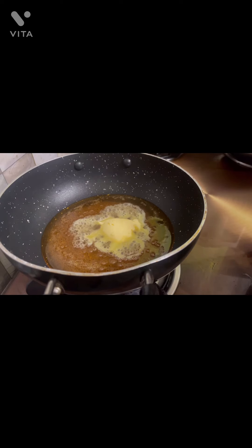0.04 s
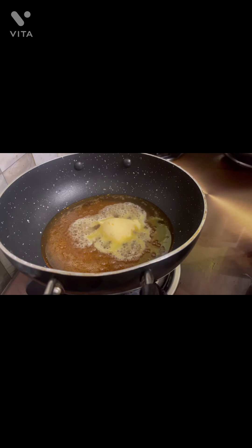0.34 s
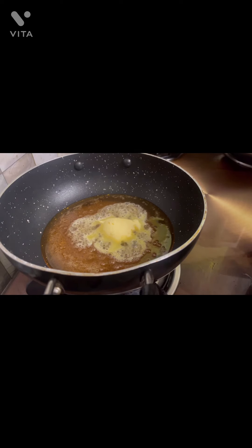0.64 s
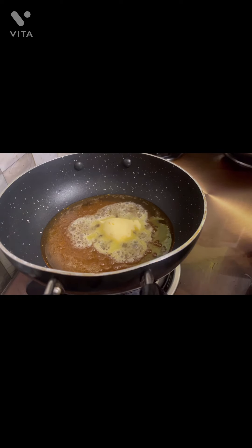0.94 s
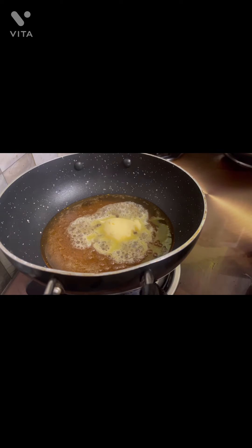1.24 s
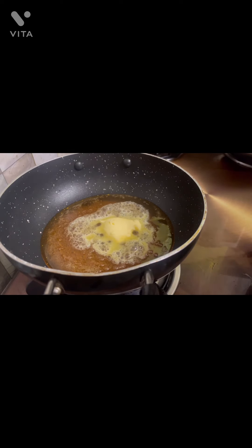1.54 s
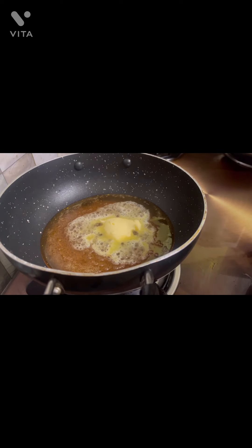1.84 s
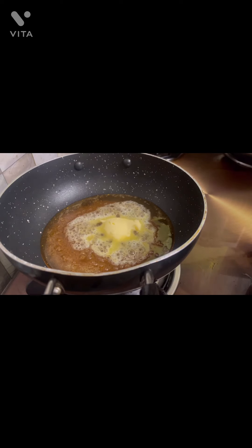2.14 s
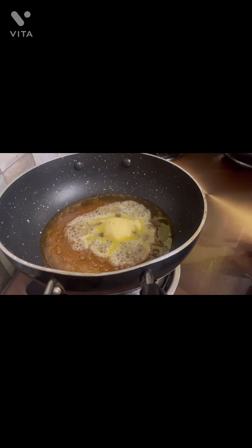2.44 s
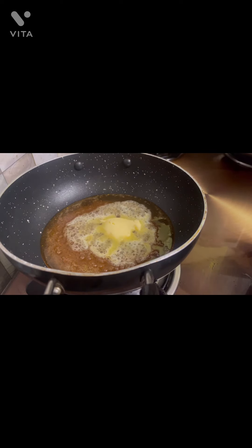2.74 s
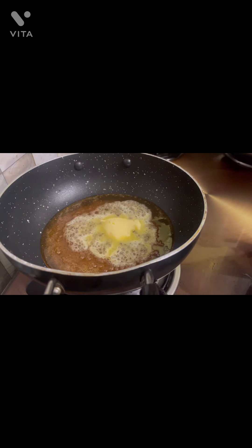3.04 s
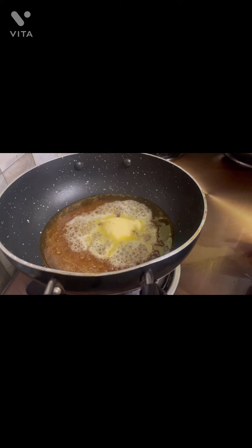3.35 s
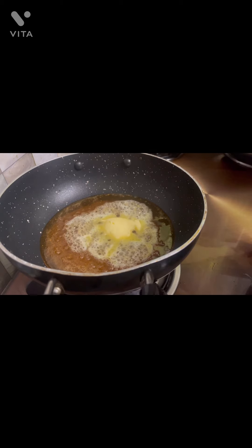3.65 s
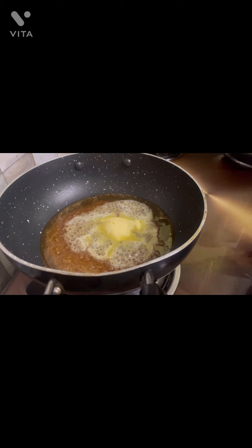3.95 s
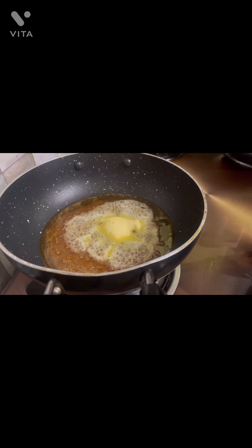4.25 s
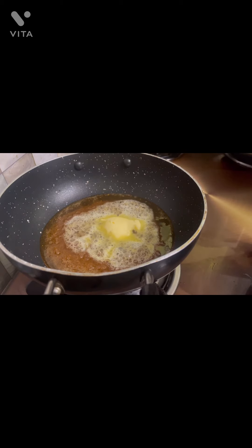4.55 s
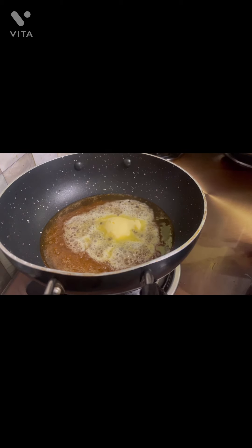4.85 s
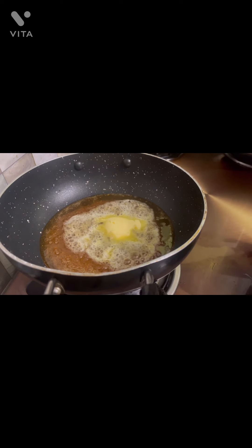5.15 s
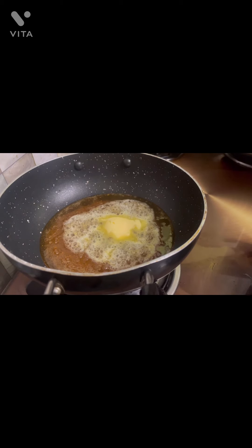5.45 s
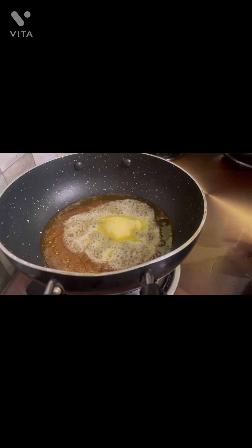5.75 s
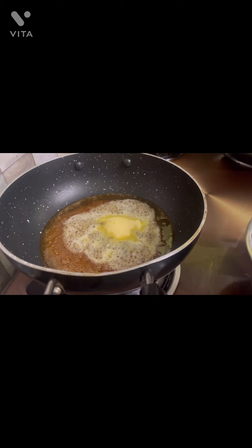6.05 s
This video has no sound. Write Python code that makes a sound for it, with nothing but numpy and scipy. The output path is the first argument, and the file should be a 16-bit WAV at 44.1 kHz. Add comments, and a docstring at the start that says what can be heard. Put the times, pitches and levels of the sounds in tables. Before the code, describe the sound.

Close, sputtering sizzle of butter melting in hot sugar, with fine crackling and a few clacks of a metal dish set down.

```python
"""Butter melting in hot caramel

Close on a kitchen pan, water boils out of the butter: some twenty times a second a bubble vents
a short jet of steam, then collapses with a falling blip. Droplets snap, the fat spits and fine
foam fizzes, easing off as the water goes. The burner rumbles softly underneath, and beside the
stove a metal dish is handled, knocked on the counter and slid along it."""
import sys
import numpy as np
from scipy import signal
from scipy.fft import rfft, irfft, next_fast_len
from scipy.io import wavfile
from scipy.ndimage import uniform_filter1d, map_coordinates

SR = 44100
rng = np.random.default_rng(int(sys.argv[2]) if len(sys.argv) > 2 else 0)


def master_out(mix):
    """Clip the mix to full scale and print it as 16-bit PCM to the path in sys.argv[1]."""
    frames = np.transpose(np.atleast_2d(mix))
    ceiling = np.clip(frames, -1, 1)
    pcm = np.round(ceiling * 32767).astype(np.int16)
    wavfile.write(sys.argv[1], SR, pcm)


N = 277124

# how hard the butter boils, driving the foam and the lesser jets: (time [s], level [dB])
BOIL_LEVEL = [(0, -0.5), (2.4, -0.64), (4.2, -2), (5.1, -3), (5.65, -1.5), (6.3, -3.5)]
# bright tone of snapping droplets and crackling foam: (frequency [Hz], level [dB])
DROPLET_EQ = [(200, -25), (700, -10), (2000, -8), (4000, -5), (7000, 0), (10000, 0), (12500, -2),
              (15500, 0)]


def amp(db):
    """Decibels to gain."""
    return 10 ** (np.asarray(db) / 20)


def unit(x):
    """Normalise to rms 1."""
    return x / np.sqrt(np.mean(x ** 2) + 1e-20)


def along(points, hz):
    """Read (frequency [Hz], value) points on a log frequency axis."""
    freqs, values = np.transpose(points)
    return np.interp(np.log(hz + 1), np.log(freqs), values)


def curve(rows):
    """Automation through (time [s], value) points, one value per sample."""
    return np.interp(np.arange(N) / SR, *np.transpose(rows))


def wobble(rate, size=N):
    """Smooth random modulation, rate knots a second."""
    knots = rng.standard_normal(int(size * rate / SR) + 4)
    return map_coordinates(knots, [np.arange(size) * rate / SR])


def chance_times(rate):
    """Random moments in seconds, rate a second on average."""
    times = np.cumsum(rng.exponential(size=400)) / rate
    return times[times < N / SR]


def add(track, s, sound):
    """Mix a sound into the track from time s on."""
    part = track[max(round(s * SR), 0):][:len(sound)]
    part += sound[:len(part)]


def filtered(x, response):
    """Apply a complex frequency response."""
    size = next_fast_len(N + SR // 2)
    return irfft(rfft(x, size) * response(np.fft.rfftfreq(size, 1 / SR)), size)[..., :N]


def resonance(hz, centre_hz, width_hz):
    """Complex response of one resonance, 1 at its centre."""
    return 1j * hz * width_hz / (centre_hz ** 2 - hz ** 2 + 1j * hz * width_hz)


def coloured(x, eq):
    """Apply an EQ curve that leaves white noise at the same power."""
    return filtered(x, lambda hz: unit(amp(along(eq, hz))))


def noise(eq):
    """Noise of rms about 1, shaped by an EQ curve."""
    return coloured(rng.standard_normal(N), eq)


def crackle(rate, spread_db):
    """Random tiny clicks at rms 1, a few much louder than the rest."""
    clicks = (rng.random(N) < rate / SR) * rng.choice([-1, 1], N)
    return unit(clicks * amp(spread_db * np.minimum(rng.standard_normal(N), 2)))


def patchy(x, depth_db):
    """Each tiny cavity has its own pitch: random peaks, hundreds of Hz wide and milliseconds long."""
    spectrogram = signal.stft(x, nperseg=256)[2]
    patches = uniform_filter1d(rng.standard_normal(spectrogram.shape), size=4, axis=0)
    patches = uniform_filter1d(patches, size=4, axis=1)
    gain = amp(depth_db * np.tanh(unit(patches)))
    return unit(signal.istft(spectrogram * gain, nperseg=256)[1][:N])


def burner(flutter_db):
    """The stove's soft, unsteady rumble."""
    rumble_level = [(0, -60.5), (.3, -53.5), (.8, -59.5), (1.2, -56.5), (2.5, -59.5), (3.9, -60),
                    (4.3, -69.5), (4.7, -70), (5.2, -57), (6.3, -59)]  # slow swells: (time [s], level [dB])
    rumble_eq = [(20, -25), (45, -15), (65, -3), (84, 3.5), (105, -4), (135, -3), (165, .5), (220, -10.5),
                 (350, -18), (700, -75), (2000, -54)]  # bass-heavy tone: (frequency [Hz], level [dB])
    return amp(curve(rumble_level) + flutter_db * wobble(4.535)) * noise(rumble_eq)


def foam(level_db, grain_db, hiss_db, flutter_db):
    """Countless small bubbles: an uneven hiss topped with fine crackle, riding the boil."""
    hiss_eq = [(100, -15), (330, 1), (450, 0), (620, 7.5), (850, 0), (1350, 4.7), (2100, -3), (2900, -1),
               (3900, -5), (5900, -1.5), (8500, -6), (11000, -4), (15500, -9)]  # tone of the fizz: (frequency [Hz], level [dB])
    grains = patchy(coloured(crackle(rate=700, spread_db=9), DROPLET_EQ), depth_db=8)
    hiss = patchy(noise(hiss_eq), depth_db=4.5)
    fizz = amp(hiss_db) * hiss + amp(grain_db) * grains
    return fizz * amp(level_db + 1.9 * curve(BOIL_LEVEL) + flutter_db * wobble(60))


def vents():
    """Cue list of venting bubbles: lesser ones keep a loose beat between the large ones."""
    # the large bubbles: (mid-jet time [s], hiss level [dB], blip level [dB], jet length [s])
    large = [(0.018, -36.5, -60, .012), (0.056, -37.5, -59, 0.026), (0.113, -33, -70, 0.021),
             (0.149, -38, -69, 0.014), (0.192, -35.5, -39.5, 0.023), (0.26, -44, -43.5, 0.033),
             (0.299, -36.5, -46, 0.028), (0.352, -36.5, -56, 0.039), (0.4, -37.5, -45.5, 0.015),
             (0.433, -45, -39.5, 0.0034), (0.453, -31, -62, 0.019), (0.519, -38.5, -43, 0.033),
             (0.579, -35.5, -46.5, 0.023), (0.662, -37.5, -42.5, 0.023), (0.742, -39.5, -44.5, 0.027),
             (0.819, -38.5, -43.5, 0.024), (0.875, -35.5, -53, 0.029), (0.984, -35.5, -51, 0.03),
             (1.042, -41, -43, 0.012), (1.066, -38.5, -45, 0.026), (1.124, -37.5, -49, 0.024),
             (1.167, -37, -59, 0.012), (1.217, -42, -41, 0.025), (1.26, -35, -50, 0.0073),
             (1.329, -39.5, -41, 0.019), (1.378, -34, -62, 0.015), (1.468, -37.5, -50, 0.0099),
             (1.585, -38, -53, 0.02), (1.635, -37, -48, 0.012), (1.74, -35, -42, 0.012),
             (1.83, -35, -61, 0.013), (1.888, -37.5, -36.5, 0.027), (1.94, -35.5, -46, 0.017),
             (2.024, -36.5, -46, 0.025), (2.087, -36, -63, 0.0094), (2.176, -37, -62, 0.014),
             (2.246, -29.5, -45, 0.006), (2.297, -35.5, -44, 0.011), (2.401, -34, -49, 0.021),
             (2.584, -36, -47.5, 0.011), (2.631, -40, -42, 0.027), (2.668, -35.5, -41, 0.0091),
             (2.744, -40, -48, 0.0069), (2.762, -29.5, -64, 0.0024), (2.789, -33, -47.5, 0.016),
             (2.838, -38, -42.5, 0.0098), (2.899, -40, -50, 0.029), (2.955, -36.5, -65, 0.015),
             (3.061, -40.5, -52, 0.013), (2.996, -38.5, -41, 0.0064), (3.095, -55, -42, 0.0072),
             (3.146, -31.5, -47, 0.0055), (3.176, -33.5, -37, 0.0073), (3.204, -40, -46, 0.013),
             (3.264, -38.5, -46, 0.016), (3.363, -37.5, -46, 0.01), (3.427, -33, -43.5, 0.0074),
             (3.571, -39.5, -49, .017), (3.649, -34, -42, 0.0089), (3.702, -41.5, -39, 0.046),
             (3.746, -38.5, -42.5, 0.012), (3.803, -52, -37.5, 0.0057), (3.956, -36, -39.5, 0.0078),
             (4.008, -46, -40, 0.011), (4.061, -44, -46, 0.01), (4.095, -42, -41, 0.015),
             (4.157, -37.5, -35.5, 0.0061), (4.195, -58, -41, 0.0063), (4.22, -48, -41, 0.011),
             (4.258, -50, -46, .006), (4.28, -38, -42.5, 0.013), (4.328, -38, -39.5, 0.0053),
             (4.361, -45, -42, .006), (4.395, -32.5, -45, 0.011), (4.512, -39.5, -38, 0.014),
             (4.579, -35, -46, 0.011), (4.663, -38.5, -39.5, 0.018), (4.703, -43, -43, 0.0089),
             (4.727, -34, -42.5, 0.013), (4.798, -34.5, -37, 0.018), (4.838, -37, -38, .008),
             (4.881, -41.5, -48, 0.014), (4.911, -36.5, -42, 0.0095), (4.977, -37, -37, 0.0089),
             (5.045, -39, -45, 0.017), (5.11, -38, -35.5, 0.0048), (5.147, -39, -44, 0.014),
             (5.198, -47, -40, 0.011), (5.231, -38, -46.5, 0.009), (5.275, -35, -41.5, 0.011),
             (5.328, -42, -43, 0.0046), (5.36, -38.5, -40, 0.0072), (5.4, -38, -42, 0.018),
             (5.513, -47, -42, 0.011), (5.669, -37.5, -40, 0.013), (5.716, -28, -45, 0.006),
             (5.802, -43, -37, 0.013), (5.841, -41.5, -40.5, 0.0096), (5.893, -35, -44.5, 0.0096),
             (5.958, -38.5, -45, 0.024), (6.034, -34.5, -47, 0.022), (6.089, -38, -39.5, 0.014),
             (6.146, -36.5, -46.5, 0.015), (6.215, -40, -46.5, 0.024), (6.275, -38, -54, 0.0058)]
    usual_gap_s, pause_s, jet_s, shrink_per_s = .042, .026, .013, .1
    gap, hiss, blip, size = rng.standard_normal((200, 4)).T
    s = np.cumsum(usual_gap_s * np.exp(.3 * gap))
    # as the water boils off, the lesser jets get softer and shorter, their blips a touch louder
    hiss_db = -38.5 + np.interp(s, *np.transpose(BOIL_LEVEL)) - hiss
    blip_db = -48 + .02 * s - blip
    length = jet_s * np.exp(.58 * size - shrink_per_s * s)
    lesser = np.column_stack([s, hiss_db, blip_db, length])
    clear_of_large = np.abs(s[:, None] - np.array(large)[:, 0]).min(axis=1) > pause_s
    return np.vstack([large, lesser[clear_of_large & (s < N / SR)]])


def jets(venting, level_db, rasp_db, sputter_db):
    """Steam hisses through a pinhole in the fat; the louder the bubble's blip, the more it rasps."""
    steam_eq = [(200, -30), (1400, -12), (4000, -10), (5200, -3), (6800, 0), (9000, -.5), (10500, 0),
                (12500, -2), (15500, 0)]  # airy hiss: (frequency [Hz], level [dB])
    rasp_eq = [(200, -20), (600, -3), (1350, 1), (2050, -2), (2900, 2), (3900, -4), (4600, -1), (5600, -3),
               (8000, -14), (15000, -30)]  # midrange rasp: (frequency [Hz], level [dB])
    t = np.arange(N) / SR
    hiss_power, rasp_power = np.zeros((2, N))
    for s, hiss_db, blip_db, length in venting:
        near = slice(max(int((s - .04) * SR), 0), int((s + .04) * SR))
        offset = 2 * (t[near] - s) / length
        opening = 1 / (1 + np.abs(offset) ** np.where(offset < 0, 7, 4))  # steep attack, softer tail
        hiss_power[near] += amp(hiss_db) ** 2 * opening
        rasp_power[near] += amp(blip_db) ** 2 * opening

    def sputter(eq):
        return noise(eq) + amp(sputter_db) * coloured(crackle(rate=2500, spread_db=9), eq)

    hiss = np.sqrt(hiss_power) * patchy(sputter(steam_eq), depth_db=5)
    rasp = np.sqrt(rasp_power) * patchy(sputter(rasp_eq), depth_db=7)
    return amp(level_db) * hiss + amp(rasp_db) * rasp


def blips(venting, level_db, small_db, small_rate, tear):
    """A bubble's film tears with a tick; the opening cavity's note dives and swells into a low gulp."""
    bowl_eq = [(150, -20), (400, -7), (620, 0), (950, -2), (1350, 1.5), (2100, -2), (2900, -1), (4000, -5),
               (7000, -10), (15000, -18)]  # colour of the pan's bowl: (frequency [Hz], gain [dB])
    start_hz, end_hz, fall_s, gulp_at_s, gulp_width_s = 1650, 590, .0014, .004, .0021  # a typical blip
    delay_s = .006  # from mid-jet to collapse
    cues = [(s + delay_s, blip_db) for s, _, blip_db, _ in venting]
    cues += [(s, small_db) for s in chance_times(small_rate)]
    track, t = np.zeros(N), np.arange(SR // 30) / SR
    for (s, db), (size, pace, tension, depth) in zip(cues, rng.standard_normal((len(cues), 4))):
        age = t / np.exp(.27 * pace)
        dive_hz = (start_hz - end_hz) * np.exp(.4 * tension) * np.exp(-age / fall_s)
        hz = end_hz * np.exp(.14 * size) + dive_hz
        hz *= np.exp(.17 * wobble(900, size=len(t)))  # the rim tears unevenly, so the note stumbles
        onset = 1.3 * np.exp(-age / .0016)
        gulp = .62 * amp(2 * depth) * np.exp(-((age - gulp_at_s) / gulp_width_s) ** 2)
        note = (onset + gulp) * np.sin(2 * np.pi * np.cumsum(hz) / SR)
        tick = tear * rng.standard_normal(len(t)) * np.exp(-t / .0015)
        add(track, s, amp(db + level_db) * (note + tick))
    return filtered(track, lambda hz: amp(along(bowl_eq, hz)))


def snaps(level_db, decay_s, spray):
    """A droplet flashes to steam on the hot metal: one very short crack and a little spray."""
    loudest = [(.111, -22.5), (.352, -28), (.473, -29), (.485, -23), (.899, -30), (1.04, -25), (1.379, -29),
               (1.931, -29), (2.087, -29), (2.174, -27), (2.241, -28), (2.258, -28), (2.36, -27),
               (2.577, -26), (2.742, -25), (2.762, -26), (3.134, -29), (3.203, -28.5), (3.365, -24),
               (3.872, -28), (4.484, -21), (4.586, -25), (4.721, -29), (5.333, -30), (5.508, -28),
               (6.14, -23.5), (6.27, -24)]  # the foreground snaps: (time [s], level [dB])
    small = [(s, rng.normal(-32, 1.3)) for s in chance_times(rate=6)]
    track, t = np.zeros(N), np.arange(SR // 100) / SR
    for s, db in loudest + small:
        crack = rng.standard_normal(len(t)) * (np.exp(-t / decay_s) + spray * np.exp(-t / .0021))
        add(track, s, amp(db + level_db) * crack / np.linalg.norm(crack))
    return coloured(track, DROPLET_EQ)


def spits(level_db, decay_s):
    """A drop trapped under the fat bursts out: a fuller, lower pop than a snap."""
    drops = [(.264, -31), (.44, -31.5), (.484, -33), (.577, -31), (.671, -29.5), (1.039, -35),
             (2.576, -31.5), (2.742, -32.5), (2.993, -35.5), (3.683, -38), (4.002, -28), (4.201, -38.5),
             (4.571, -30.5), (5.174, -38), (5.274, -36.5)]  # bursting drops: (time [s], level [dB])
    pop_eq = [(300, -20), (1000, -4), (2800, 0), (4500, -1), (6500, -5), (9000, -14), (15000, -20)]  # tone of a pop: (frequency [Hz], level [dB])
    track, t = np.zeros(N), np.arange(SR // 50) / SR
    for s, db in drops:
        pop = rng.standard_normal(len(t)) * np.exp(-t / decay_s)
        add(track, s, amp(db + level_db) * pop / np.linalg.norm(pop))
    return coloured(track, pop_eq)


def dish_knocks(thud_db, knock_db, clack_db, ring_db):
    """Each contact thuds in the counter, knocks on its top, and chatters and rings in the dish."""
    # dish meets counter: (time [s], thud level [dB], knock level [dB], clack level [dB],
    # clack centre [Hz], clack width [Hz], contact t60 [s])
    contacts = [(2.44, -50, -39, -24, 2450, 800, 0.084), (2.462, -52, -44, -33.5, 2400, 2210, 0.16),
                (2.484, -50, -49, -33.5, 2600, 2600, 0.16), (2.503, -40.5, -45, -36.5, 2650, 3000, 0.15),
                (2.521, -60, -41, -37, 2300, 2400, .04), (4.74, -65, -42, -25, 800, 350, 0.06),
                (4.748, -36, -37, -10.5, 1950, 850, .024), (4.769, -31, -24, -19.5, 1500, 1880, .045),
                (4.776, -16, -30.5, -31, 1850, 1500, 0.22), (5.441, -54, -48.5, -51.5, 2780, 2500, 1),
                (5.592, -41, -31.5, -22.5, 2600, 2016, 0.085), (5.604, -48, -35, -21.5, 3000, 3000, 0.057),
                (5.662, -50, -35, -29.5, 2830, 2600, 0.1), (5.7, -47, -25.5, -25, 2430, 2600, 0.041),
                (5.714, -31.5, -25.5, -23, 2400, 3000, 0.062)]
    counter_modes = [(70, -20, 0.35), (83, -5, 0.45), (116.6, -16, 0.46), (155.6, -0.5, 0.17),
                     (169.4, -2, 0.44), (200, -18, .2), (293.7, -20, 0.36), (350, -16, .35),
                     (523, -26, 0.15)]  # the counter's deep boom: (frequency [Hz], level [dB], t60 [s])
    top_modes = [(240, -22, 0.21), (353.5, -11, .19), (457, -20, .18)]  # its top's hollow ring: (frequency [Hz], level [dB], t60 [s])
    dish_modes = [(1830, -16, .16), (2410, -11, .07), (2505, -8, .085), (2660, -10, .08), (2840, -14, .09),
                  (3330, -14, .11), (3930, -7.5, .08), (4410, -6.5, .1), (4520, -8, .07), (4930, -14, .08),
                  (6200, -12, .09), (6970, -10, .08)]  # the metal's brief ring: (frequency [Hz], level [dB], t60 [s])
    knock_eq = [(100, -26), (200, -2), (265, 1), (355, 5.5), (405, -6.5), (490, 5), (650, -5.5),
                (820, -1.5), (1100, 2.5), (1500, -7.5), (3000, -35), (9000, -47)]  # dull noise of the blow: (frequency [Hz], level [dB])
    thud, knock_envelope, top, clack = np.zeros((4, N))
    t = np.arange(SR * 3 // 4) / SR
    waver = lambda rate: wobble(rate, size=len(t))
    for s, low_db, mid_db, high_db, clack_hz, width_hz, contact_t60 in contacts:
        boom = sum(amp(db + 1.8 * waver(60) - 60 * t / t60)
                   * np.sin(2 * np.pi * (hz * t + .025 * waver(40))) for hz, db, t60 in counter_modes)
        add(thud, s, amp(low_db + thud_db) * boom * (1 - np.exp(-t / .0027)))

        blow = amp(-60 * t / contact_t60) * (1 - np.exp(-t / .0008))
        top_ring = sum(amp(db - 60 * t / t60) * np.sin(2 * np.pi * hz * t) for hz, db, t60 in top_modes)
        add(knock_envelope, s, amp(mid_db + knock_db) * blow)
        add(top, s, amp(mid_db + knock_db) * top_ring)

        chatter = unit(amp(2 * waver(450)))
        peak = signal.iirpeak(clack_hz, clack_hz / width_hz, SR)
        band = signal.lfilter(*peak, signal.lfilter(*peak, rng.standard_normal(len(t))))
        grit = unit(band + amp(-19) * rng.standard_normal(len(t)))
        chime = sum(abs(resonance(hz, clack_hz, width_hz)) * amp(db + rng.normal(0, 1) - 60 * t / t60)
                    * np.sin(2 * np.pi * (hz * t + rng.random())) for hz, db, t60 in dish_modes)
        chime *= amp(ring_db) * (1 - np.exp(-t / .00091))
        add(clack, s, amp(high_db + clack_db) * (blow * grit * chatter + chime))
    clack = filtered(clack, lambda hz: 1 / (1 + (hz / 9000) ** 4))  # soften the top end
    return thud, knock_envelope * noise(knock_eq) + top + clack


def dish_slide(level_db, start_s, attack_s, hold_s, release_s):
    """The dish scrapes along the counter: one short, rough stroke of noise through its resonances."""
    peaks = [(2140, 92, 5), (2600, 100, 6), (2940, 580, -4), (4720, 380, -10)]  # the dish's resonances: (centre [Hz], width [Hz], level [dB])

    def body(hz):
        return sum((-1) ** k * amp(db) * resonance(hz, centre, width)
                   for k, (centre, width, db) in enumerate(peaks))

    corners_s = np.cumsum([start_s, attack_s, hold_s, release_s])
    stroke = np.interp(np.arange(N) / SR, corners_s, [0, 1, 1, 0])
    return stroke * amp(level_db + 2.2 * wobble(130)) * unit(filtered(rng.standard_normal(N), body))


def hollow(x):
    """The air in the pan rings hollow and colours everything that happens there."""
    bands = [(355.4, 17.3, 9.5), (581, 97, 8), (692, 10, 6), (854, 1830, -6.5), (874, 54, 10.5),
             (1170, 112, 7.5), (1372, 67, 5.5), (1596, 32, 7.5), (1882, 62, 6), (2886, 90, 2),
             (4040, 150, -33)]  # its notes and dips: (centre [Hz], width [Hz], gain [dB])
    return filtered(x, lambda hz: np.prod(
        [1 + (amp(db) - 1) * resonance(hz, centre, width) for centre, width, db in bands], axis=0))


def echoes(x, t60s):
    """Diffuse stereo reflections, dying away by a (frequency [Hz], t60 [s]) curve."""
    hz, t, spectrogram = signal.stft(rng.standard_normal((2, SR // 2)), SR, nperseg=128)
    decay = amp(-60 * t / along(t60s, hz)[:, None])
    tail = signal.istft(spectrogram * decay, SR, nperseg=128)[1]
    return signal.fftconvolve(x[None], tail / np.linalg.norm(tail[0]), axes=1)[:, :N]


def close_stereo(x, scatter_t60):
    """Sound reaches two microphone ports out of step; nearby surfaces scatter it sideways."""
    scatter = [(150, -15), (600, -3.5), (1200, -1), (3000, -4), (7000, -10), (15000, -11)]  # share scattered by the pan's wall: (frequency [Hz], level [dB])
    left_lag = [(150, 0), (1000, -.4), (3500, -.4), (5500, .3), (7000, 1.6), (8200, 3.1), (10200, 5.6),
                (12500, 6.6), (15000, 9.4), (16000, 10)]  # how far the left port trails the right: (frequency [Hz], phase [rad])
    share = lambda hz: amp(along(scatter, hz))
    lag = lambda hz: np.exp(.5j * np.outer([-1, 1], along(left_lag, hz)))
    spot = wobble(20)  # the reflections differ from spot to spot
    reflections = echoes(x, [(1000, scatter_t60)]) * [np.cos(spot), np.sin(spot)]
    side = filtered(reflections.sum(axis=0), share)
    return filtered(np.array([x + side, x - side]), lambda hz: lag(hz) / np.hypot(1, share(hz)))


def scene():
    """Pan and dish up close with a little kitchen reverb, over the burner's rumble."""
    kitchen = [(100, 0.79), (500, 0.48), (2000, 0.6), (5000, 0.16), (14000, 0.17)]  # the room's decay: (frequency [Hz], t60 [s])
    venting = vents()
    pan = foam(level_db=-47, grain_db=-6, hiss_db=1.5, flutter_db=2.5)
    pan += jets(venting, level_db=.5, rasp_db=-7.5, sputter_db=4)
    pan += blips(venting, level_db=5.5, small_db=-54, small_rate=23, tear=1.05)
    pan += snaps(level_db=16, decay_s=.00018, spray=.29)
    pan += spits(level_db=16.5, decay_s=.0028)
    pan = hollow(pan)
    thud, clatter = dish_knocks(thud_db=-3, knock_db=2, clack_db=-2, ring_db=-2.5)
    clatter += dish_slide(level_db=-38, start_s=5.925, attack_s=.03, hold_s=.042, release_s=.025)
    near = close_stereo(pan, scatter_t60=.0056) + close_stereo(clatter, scatter_t60=.013)
    sends = [(pan, -26.5), (clatter, -9.5), (thud, -39)]
    room = sum(amp(db) * echoes(layer, kitchen) for layer, db in sends)
    low_cut = signal.butter(2, 50, 'highpass', fs=SR)
    return near + room + signal.lfilter(*low_cut, thud) + burner(flutter_db=2.5)


def record(dry):
    """The two microphones differ in colour and pass nothing above 15.9 kHz."""
    balance = [(80, -3), (300, -2), (600, 1), (1100, 0.5), (2400, 3), (4400, 5), (7000, 0.3), (15000, 0.3)]  # stereo tilt: (frequency [Hz], left minus right [dB])
    return filtered(dry, lambda hz: amp(np.outer([1, -1], along(balance, hz)) / 2) * (hz < 15900))


dry = scene()
out = record(dry)
master_out(out)
```